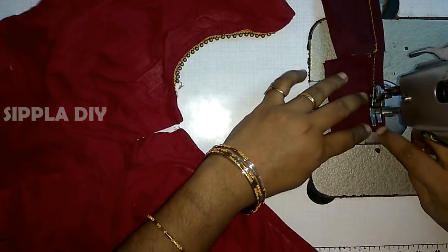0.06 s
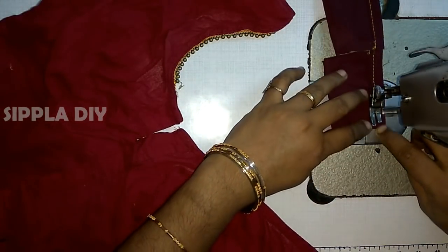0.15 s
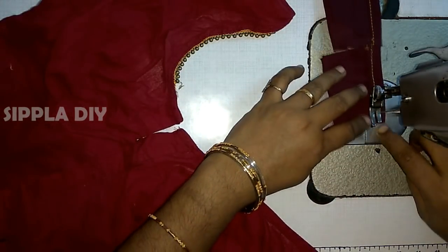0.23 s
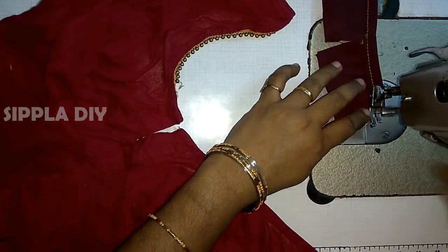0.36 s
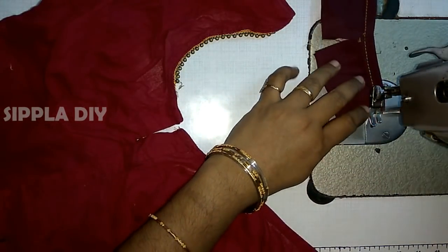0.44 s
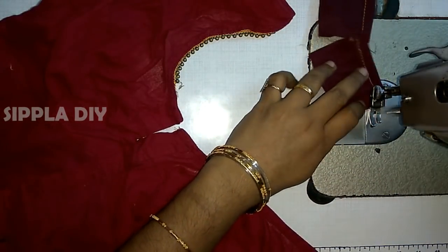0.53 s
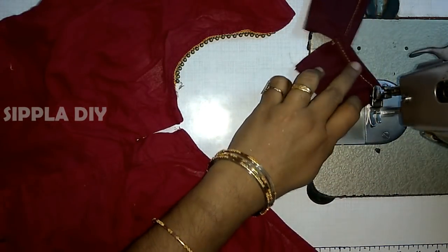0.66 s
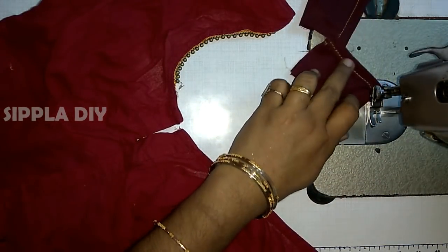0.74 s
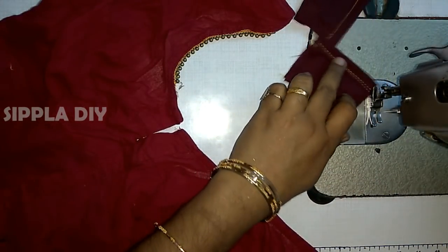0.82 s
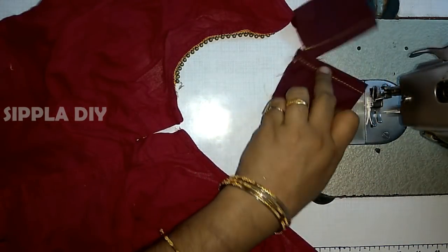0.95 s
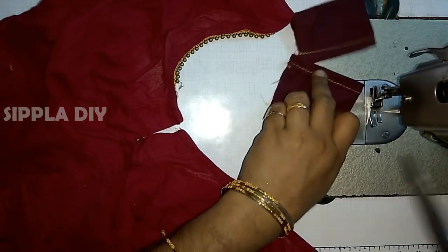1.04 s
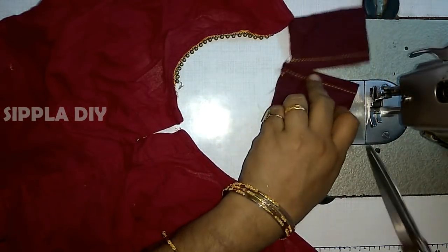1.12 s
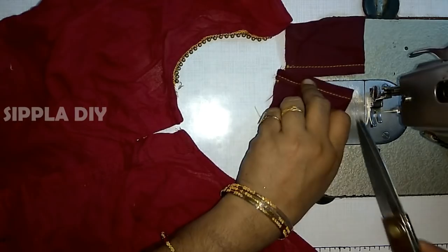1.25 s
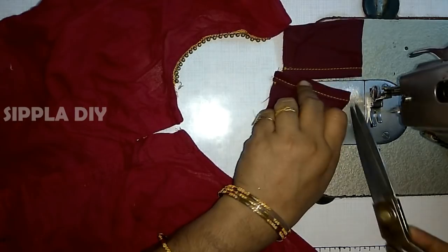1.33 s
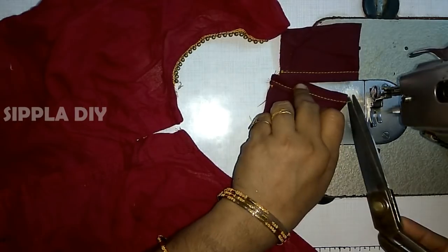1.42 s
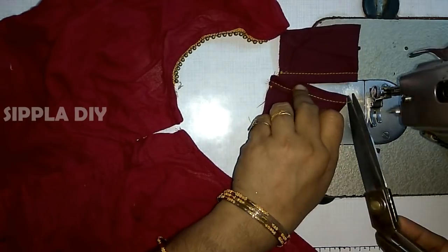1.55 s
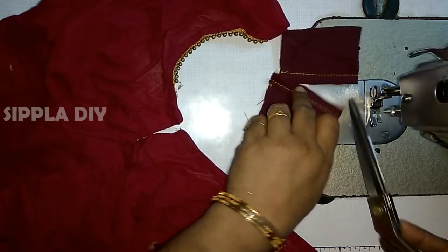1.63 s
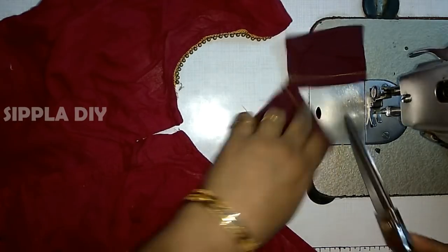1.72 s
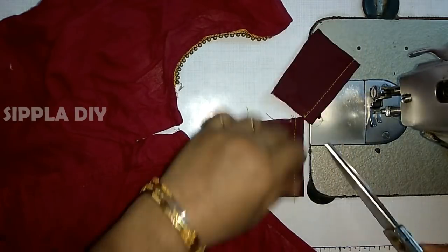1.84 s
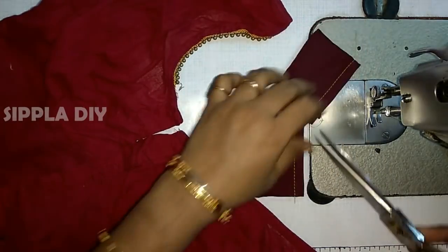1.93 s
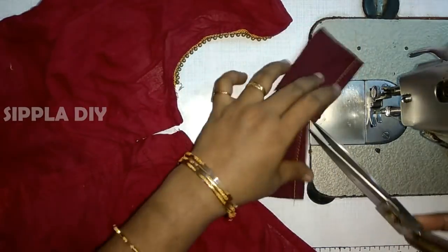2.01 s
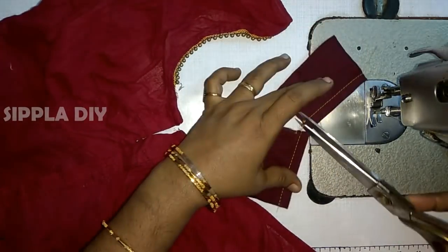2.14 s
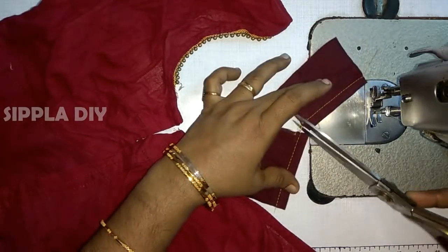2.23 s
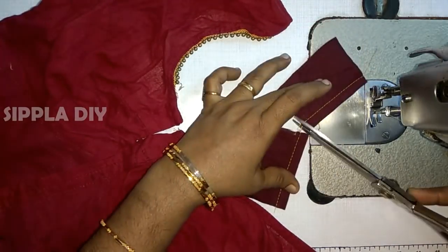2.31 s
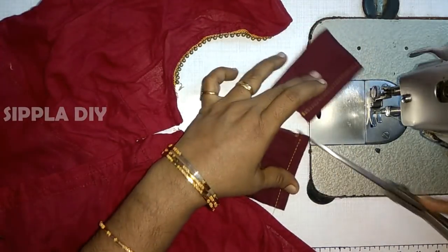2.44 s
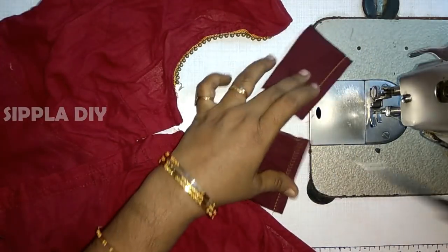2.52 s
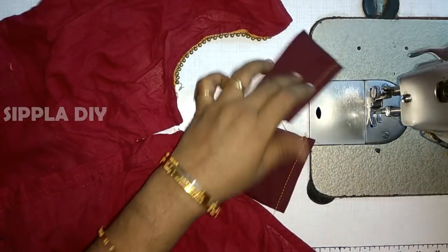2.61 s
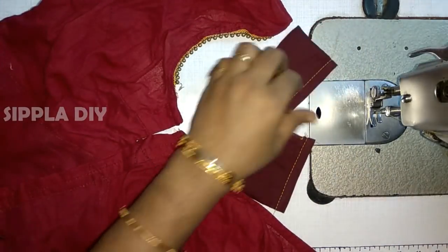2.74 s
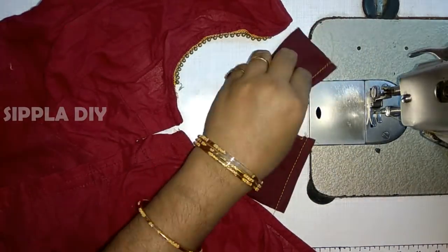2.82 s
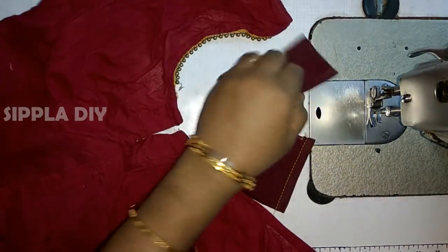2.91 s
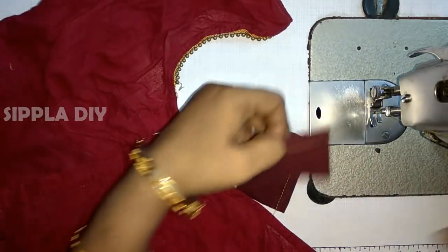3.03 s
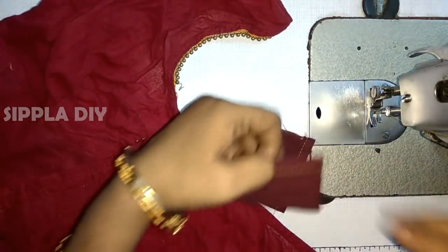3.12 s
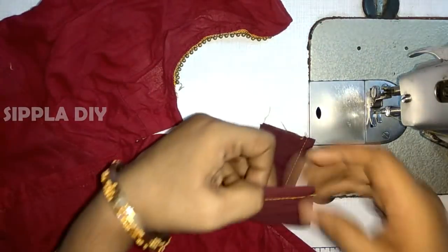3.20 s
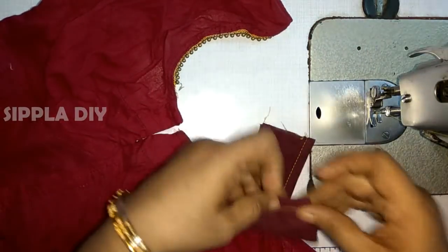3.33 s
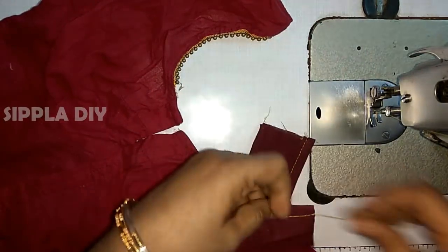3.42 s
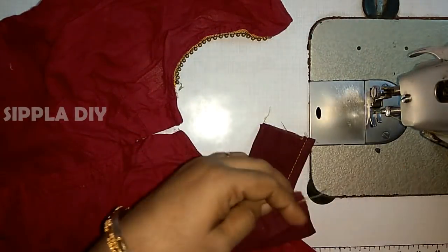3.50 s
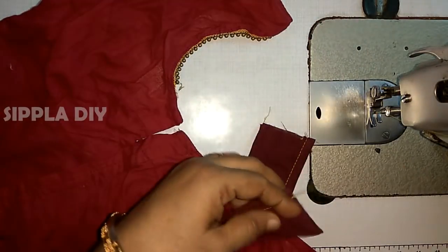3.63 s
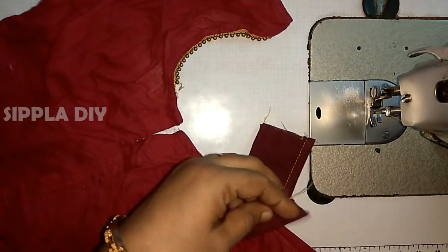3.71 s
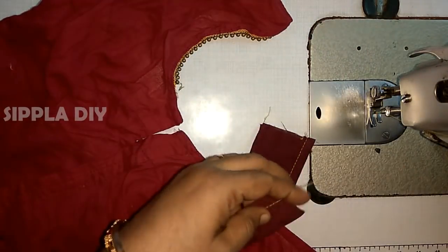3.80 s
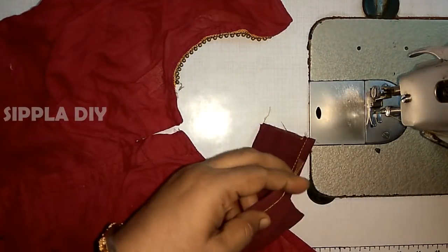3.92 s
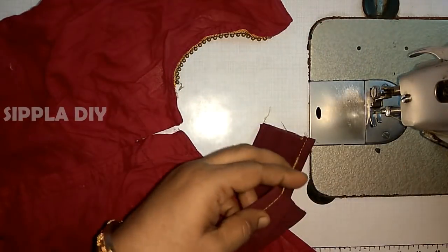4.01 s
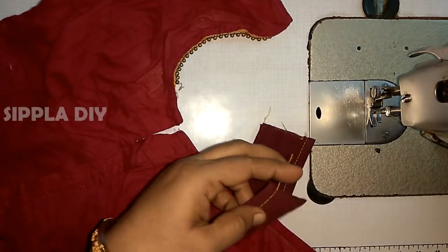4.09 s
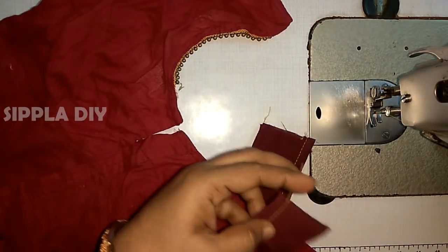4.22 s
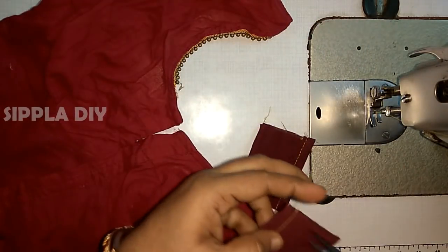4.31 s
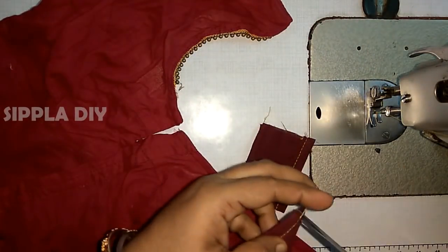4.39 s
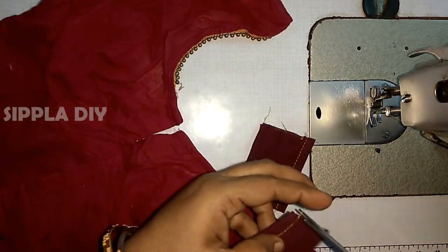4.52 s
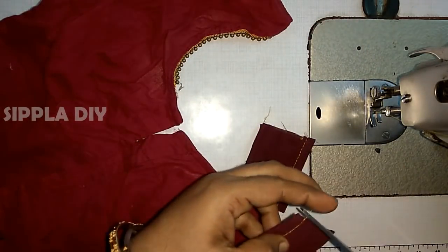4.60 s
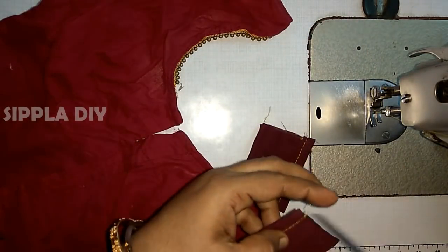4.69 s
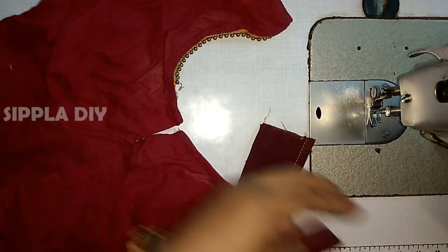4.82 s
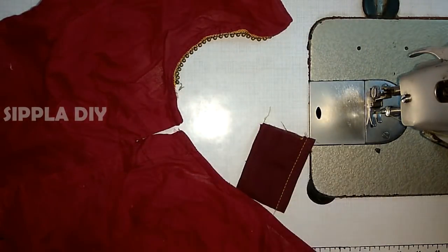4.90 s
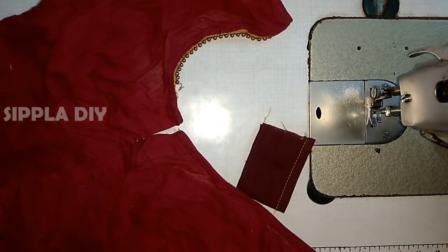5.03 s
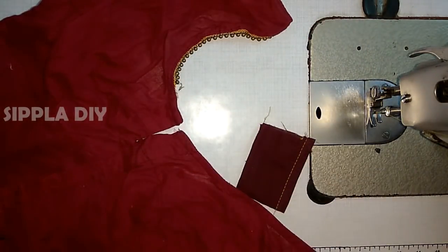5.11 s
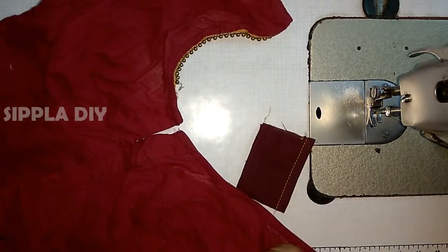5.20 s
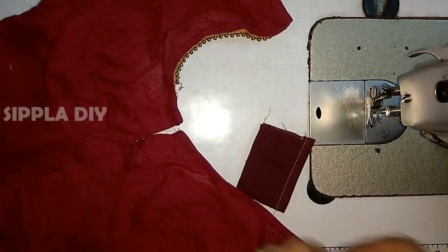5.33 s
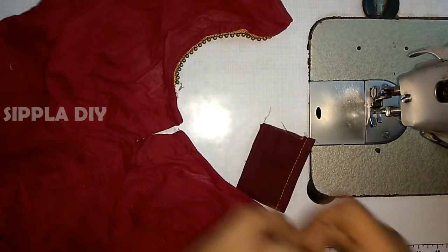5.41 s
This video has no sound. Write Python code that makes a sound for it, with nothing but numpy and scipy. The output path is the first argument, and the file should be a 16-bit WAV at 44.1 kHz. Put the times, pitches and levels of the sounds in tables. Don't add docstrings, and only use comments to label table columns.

```python
import sys
import numpy as np
from scipy import signal
from scipy.fft import rfft, irfft, next_fast_len
from scipy.io import wavfile
from scipy.ndimage import uniform_filter1d, minimum_filter1d, map_coordinates

SR = 44100
rng = np.random.default_rng(int(sys.argv[2]) if len(sys.argv) > 2 else 0)


def to_wav(sig):
    pcm = np.clip(np.atleast_2d(sig), -1, 1) * 32767
    pcm = np.round(pcm).astype(np.int16)
    wavfile.write(sys.argv[1], SR, pcm.T)


def gain_from_decibels(decibels):
    exponent = np.asarray(decibels, float) / 20
    return 10 ** exponent


N = 240520
LOW_MIDDLE_HZ, MIDDLE_HIGH_HZ = 800, 3000
BLOW_RISE_S = 0.013
# time_s, effort_db
RUNNING_EFFORT = [(0, -33.5), (.25, -35.5), (.4, -33), (.6, -37.5), (.7, -35.5), (.82, -28.5), (.95, -28.5),
                  (1.1, -33.5), (1.3, -29.5), (1.45, -39), (1.67, -48), (1.85, -61)]
# start_s, clack_db, feed_db, take_up_db
STITCH_CONTACTS = [(.0024, -14, -20.5, -15), (0.0607, -11, -17.5, -18), (0.1166, -14.5, -20.5, -17),
                   (.172, -15, -18.5, -21), (0.2305, -12.5, -19.5, -20), (0.2914, -13, -17, -26),
                   (0.3472, -15, -18, -21.5), (0.4033, -15, -18, -21.5), (.4584, -12.5, -20, -21),
                   (0.515, -11.5, -22, -23), (0.5721, -14.5, -24.5, -17), (0.631, -16, -20.5, -20.5),
                   (0.6933, -15.5, -21, -20), (0.7529, -17.5, -21, -19), (0.8119, -16, -18.5, -30),
                   (0.869, -19, -35, -18), (0.9239, -34, -25, -48), (0.9905, -23.5, -31, -17.5),
                   (1.065, -20.5, -50, -16.5), (1.1357, -20, -21, -23), (1.2065, -18.5, -22, -21.5),
                   (1.274, -19.5, -23.5, -21.5), (1.3421, -19.5, -51, -17), (1.4221, -20.5, -49, -22),
                   (1.5142, -17, -30, -17), (1.6211, -19.5, -37.5, -49), (1.72, -21, -69, -60)]


def unit(x):
    return x / np.sqrt(np.mean(x ** 2) + 1e-20)


def along(points, hz):
    f, v = np.transpose(points)
    return np.interp(np.log(hz + 1), np.log(f + 1), v)


def curves(rows, before_db=None):
    s, *columns = np.transpose(rows)
    return [np.interp(np.arange(N) / SR, s, c, before_db, before_db) for c in columns]


def filtered(x, response):
    m = next_fast_len(x.shape[-1] + 8192)
    spectrum = rfft(x, m) * response(np.fft.rfftfreq(m, 1 / SR))
    return irfft(spectrum, m)[..., :x.shape[-1]]


def colour(spectrum):
    return lambda f: gain_from_decibels(along(spectrum, np.minimum(f, 6900)))


def resonances(modes):
    def response(f):
        total = 0
        for k, (hz, width_hz, db) in enumerate(modes):
            damping = 1j * f * width_hz
            total = total + (-1) ** k * gain_from_decibels(db) * damping / (hz * hz - f * f + damping)
        return total
    return response


def bands(response, patchy_db, count):
    z = signal.stft(rng.standard_normal((2, N)), nperseg=256)[2]
    field = uniform_filter1d(rng.standard_normal(z.shape), size=3, axis=1)
    field = uniform_filter1d(field, size=count, axis=2)
    noise = signal.istft(z * gain_from_decibels(patchy_db * unit(field)), nperseg=256)[1][:, :N]

    def split(f):
        low = 1 / (1 + (f / LOW_MIDDLE_HZ) ** 6)
        below_high = 1 / (1 + (f / MIDDLE_HIGH_HZ) ** 6)
        return response(f) * np.array([low, below_high - low, 1 - below_high])[:, None]
    return [unit(part) for part in filtered(noise, split)]


def flutter(rate_hz, depth_db):
    knots = rng.standard_normal((2, int(N * rate_hz / SR) + 4))
    place = np.arange(N) * rate_hz / SR
    return gain_from_decibels(depth_db * np.array([map_coordinates(k, [place]) for k in knots]))


def sides(pan_db):
    return gain_from_decibels(np.array([[.5], [-.5]]) * pan_db)


def blows(times, dbs, pans_db, t60s, rise, lag):
    power = np.zeros((2, N + SR))
    for s, db, pan_db, t60 in np.broadcast(times, dbs, pans_db, t60s):
        t = np.arange(-SR // 20, round(t60 * SR)) / SR
        shape = gain_from_decibels(db - 60 * np.where(t < 0, -t / rise, t / t60))
        power[:, round((s + lag) * SR):][:, :len(t)] += (shape * sides(pan_db)) ** 2
    return np.sqrt(power[:, SR // 20:][:, :N])


def rings(times, dbs, hzs, pans_db, t60s, attack):
    out = np.zeros((2, N + SR))
    chance = rng.uniform(size=(len(times), 4, 1))
    for (s, db, hz, pan_db, t60), u in zip(np.broadcast(times, dbs, hzs, pans_db, t60s), chance):
        t = np.arange(round(t60 * SR)) / SR
        phase = u[0] + np.array([[0], [np.sign(u[1, 0] - .5) / 4]])
        gain = gain_from_decibels(db - 60 * t / t60) * sides(pan_db) * gain_from_decibels(4.6 * u[2:])
        note = np.sin(2 * np.pi * (hz * t + phase))
        out[:, round(s * SR):][:, :len(t)] += gain * (1 - np.exp(-t / attack)) * note
    return out[:, :N]


def turns():
    full_speed_s, slowing_cap_s = .058, .013
    s = np.transpose(STITCH_CONTACTS)[0]
    length = np.diff(s)
    return s[:-1], length, np.minimum(length - full_speed_s, slowing_cap_s)


def contacts():
    # turn_share, later_per_s of slowing, middle_db, bright_ring_hz, middle_ring_hz
    moving_parts = [
        (0, -1, -11.5, 5593, 1150),
        (.45, 4, -7, 4000, 2310),
        (.625, 1.4, -14, 4000, 1712),
    ]
    bright_scatter, middle_scatter, colour_scatter_db = .06, .035, 2.5
    start, length, slowing = turns()
    s, *dbs = np.transpose(STITCH_CONTACTS)
    share, later, middle_db, bright_hz, middle_hz = np.transpose(moving_parts)[:, :, None]
    times = start + length * (share + later * slowing)

    def pad(v, last):
        return np.append(v + 0 * times, last)
    u = rng.standard_normal((3, times.size + 1))
    return (pad(times, s[-1]),
            pad(np.array(dbs)[:, :-1], dbs[0][-1]),
            pad(middle_db, middle_db[0]) + colour_scatter_db * u[0],
            pad(bright_hz, bright_hz[0]) * np.exp(bright_scatter * u[1]),
            pad(middle_hz, middle_hz[0]) * np.exp(middle_scatter * u[2]))


def clatter():
    # freq_hz, density_db per Hz
    steel_spectrum = [(350, -34), (600, 11.5), (829, -8), (1160, -9.5), (1370, -16), (1570, -8.5),
                      (2810, -11.5), (5540, -11), (7260, -20), (9440, -45), (16000, -120)]
    s, db, middle_db, bright_hz, middle_hz = contacts()
    pan_db = 1.5 * rng.standard_normal(len(s))
    _, middle, high = bands(colour(steel_spectrum), patchy_db=5.0, count=3)
    burst = high * blows(s, db - 3, pan_db, 0.036, rise=0.03, lag=0.0017)
    burst += middle * blows(s, db + middle_db - 2.5, pan_db, 0.064, rise=0.025, lag=0.0008)
    out = burst * flutter(600, depth_db=1.5)
    out += rings(s, db - 3, bright_hz, pan_db, .028, attack=.002)
    out += rings(s, db + middle_db, middle_hz, pan_db, .05, attack=0.0013)
    for late, place, size in rng.uniform(size=(5, 3, len(s))):
        small_hz = 3000 + 3600 * place
        out += rings(s + 0.011 * late, db - 11.0 - 7 * size, small_hz, pan_db, 0.033, attack=0.0015)
    whirr_db = curves(RUNNING_EFFORT, before_db=-120)[0] - 11.5
    return out + gain_from_decibels(whirr_db) * (middle + high) * flutter(300, depth_db=4.5)


def bed():
    # centre_hz, width_hz, level_db
    bed_modes = [(147, 100, -3.5), (322.2, 108, 3.5), (434, 110, 0), (542.2, 39, 2), (1150, 13, -13.5)]
    # turn_share, thud_db, rap_db, thud_db_per_s and rap_db_per_s of slowing
    bar_reversals = [
        (0.432, -10.5, -8.5, 598.5, 599.5),
        (.76, -1, -1, -150, -300),
    ]
    # thud_db, rap_db
    turn_jolts = [(-30.5, -17), (-32.5, -20), (-22.5, -25), (-24, -21.5), (-25, -20), (-31, -19),
                  (-39.5, -20.5), (-27, -18.5), (-32, -16), (-19.5, -27.5), (-33, -24.5), (-37.5, -23.5),
                  (-32.5, -19), (-34, -15.5), (-27.5, -25.5), (-32, -21), (-25, -22.5), (-25.5, -27),
                  (-21.5, -23.5), (-24, -26.5), (-23, -23), (-22, -27), (-22.5, -28), (-31, -29),
                  (-33, -32.5), (-45, -45)]
    thud_hz, thud_scatter = 162.5, .13
    rap_late = np.array([[0.023], [0.1303]])
    low, casting, _ = bands(resonances(bed_modes), patchy_db=3.5, count=6)
    start, length, slowing = turns()
    share, thud_db, rap_db, thud_grows, rap_grows = np.transpose(bar_reversals)[:, :, None]
    jolt_thud_db, jolt_rap_db = np.transpose(turn_jolts)

    s = (start + share * length).ravel()
    db = (jolt_thud_db + thud_db + thud_grows * slowing).ravel()
    hz = thud_hz * np.exp(thud_scatter * rng.standard_normal(len(s)))
    out = rings(s, db + 7, hz, 0, .075, attack=.004)
    out += rings(s, db - 11.5, 0.23 * hz, 0, 0.024, attack=.008)
    out += rings([.555], [-24], [75], 0, .12, attack=0.0084)

    s = (start + (share + rap_late) * length).ravel()
    db = (jolt_rap_db + rap_db + rap_grows * slowing).ravel()
    for hz, _, mode_db in bed_modes[1:4]:
        scatter_db = 3.0 * rng.standard_normal(len(s))
        out += rings(s, db + mode_db - 10 + scatter_db, hz, 0, 0.12, attack=.003)
    out += blows(s, db - 6.5, 0, 0.082, rise=0.057, lag=0.0052) * (low + gain_from_decibels(-3.0) * casting)
    rumble_db = curves(RUNNING_EFFORT, before_db=-120)[0] - 6
    return out + gain_from_decibels(rumble_db) * low * flutter(30, depth_db=3.5)


def room(x):
    # freq_hz, t60_s
    wall_decay = [(150, 0.27), (1000, 0.2), (4000, .2), (8000, 0.12)]
    hz, t, z = signal.stft(rng.standard_normal((2, SR // 3)), SR, nperseg=256)
    decay = gain_from_decibels(-60 * t / along(wall_decay, hz)[:, None])
    tail = signal.istft(z * decay, SR, nperseg=256)[1]
    delayed = np.pad(x, ((0, 0), (250, 0)))
    return signal.fftconvolve(delayed, tail / np.linalg.norm(tail[0]), axes=1)[:, :N]


def quiet():
    # time_s, level_db
    rest_level = [(1.84, -73.5), (2.31, -68), (3.06, -64), (3.6, -71.5), (4.17, -66.5), (4.55, -71),
                  (5.2, -64.5)]
    # freq_hz, density_db per Hz
    air_spectrum = [(15, -70), (25, -43), (97, -4), (123, -13.5), (183, -6), (365, -13.5), (401, -14.5),
                    (441, -15), (1010, -21.5), (1320, -26.5), (5590, -33), (7260, -40), (9440, -70),
                    (16000, -120)]
    # centre_hz, width_hz, level_db
    port_mode = [(5370, 350, 5.5)]
    # over_mean_db, share of the level swings
    air_layers = [
        (4, 0.7),
        (-5, 1.4),
        (-1.5, .5),
    ]
    port = resonances(port_mode)
    parts = bands(lambda f: colour(air_spectrum)(f) * (1 + np.abs(port(f))), patchy_db=4.5, count=20)
    level_db = curves(rest_level)[0]
    mean_db = level_db.mean()
    out = 0
    for (db, share), part, depth_db in zip(air_layers, parts, (2.5, 1.2, 1.2)):
        layer_db = mean_db + 5.0 + db + share * (level_db - mean_db)
        out = out + gain_from_decibels(layer_db) * part * flutter(6.4, depth_db)
    return out


def knocks():
    # start_s, peak_db, middle_db, ring_hz, left_right_db
    steel_knocks = [(1.6926, -19.5, -12.5, 5240, -3), (1.7396, -8.5, -8, 5194, 11),
                    (2.0134, -52, -3, 1590, 11), (2.4334, -64, 8, 1420, 2), (2.5115, -17, 0, 5380, 3.5),
                    (2.8568, -63.5, 28, 1190, 5), (2.9586, -37, -17, 3280, -4), (3.0144, -9, 4, 3333, 1),
                    (3.028, -24, 10, 2890, 4.5), (3.0573, -32.5, 12, 1794, 6),
                    (3.0773, -26.5, 6.5, 4540, -0.5), (3.928, -55, 5.5, 1317, -1.5),
                    (4.014, -61, 20.5, 1206, 1), (4.3485, -52, -20, 4440, -12),
                    (4.7763, -20.5, -30, 5450, -2), (4.777, -47.5, -1, 1740, 6),
                    (5.0545, -33.5, -38, 5000, 4.5), (5.208, -25.5, 1, 2870, 4.5),
                    (5.244, -27.5, -3.5, 3260, 3.5), (5.3029, -13.5, 2, 1550, 4),
                    (5.3308, 0, -9.5, 2470, 3)]
    # centre_hz, width_hz, level_db
    blade_modes = [(1600, 50, -23), (2380, 78, -12.5), (3520, 450, 4), (4296, 750, 5), (5190, 830, 7.5),
                   (6400, 400, -27)]
    # start_s, peak_db, note_hz, t60_s
    table_thumps = [(1.686, -30.5, 200, 0.08), (1.739, -32.5, 250, 0.13), (2.014, -41.5, 348, 0.099),
                    (2.176, -34.5, 443, 0.078), (2.433, -49.5, 166.6, 0.24), (2.502, -25, 432, 0.029),
                    (2.514, -23.5, 305, 0.11), (2.863, -28.5, 567, 0.088), (2.956, -26.5, 446, 0.061),
                    (3.012, -19, 358.6, 0.059), (3.055, -19, 480, 0.088), (3.079, -25.5, 548, 0.095),
                    (3.927, -40, 427, 0.057), (4.013, -32, 162, 0.21), (4.379, -52, 218, 0.15),
                    (5.208, -20, 497, 0.087), (5.244, -20, 441, 0.065), (5.302, -29.5, 376, 0.4),
                    (5.33, -15.5, 553, 0.12)]
    # centre_hz, width_hz, level_db
    table_modes = [(159, 80, -5), (317, 100, -2), (494, 90, -1.5), (648, 130, -1)]
    t60 = 0.054
    s, db, middle_db, hz, pan_db = np.transpose(steel_knocks)
    blades = resonances(blade_modes)
    _, middle, high = bands(lambda f: np.abs(blades(f)) + gain_from_decibels(-5.0), patchy_db=1.0, count=3)
    crack = high * blows(s, db - 13, pan_db, t60, rise=BLOW_RISE_S, lag=0.0014)
    crack += middle * blows(s, db + middle_db - 8.5, pan_db, 1.3 * t60, rise=BLOW_RISE_S, lag=0.0028)
    first_contact = blows(s, db - 9.5, pan_db, 0.12 * t60, rise=BLOW_RISE_S, lag=0.0022)
    crack += (high + gain_from_decibels(-13.0) * middle) * first_contact
    ping_db = db - 1 + middle_db * (hz < MIDDLE_HIGH_HZ)
    ping = rings(s, ping_db, hz, pan_db, 0.52 * t60, attack=0.0021)

    s, db, hz, t60 = np.transpose(table_thumps)
    low = bands(resonances(table_modes), patchy_db=2.0, count=6)[0]
    thump = low * blows(s, db - 5.0, 0, t60, rise=0.02, lag=0.0036)
    thump += rings(s, db - 2.0, hz, 0, 0.65 * t60, attack=0.00089)
    return crack + thump, ping


def drags():
    # start_s, rise_s, hold_s, level_db, hiss_db
    slides = [(1.764, 0.025, 0.016, -39.5, -5), (2.004, 0.012, 0.026, -58, -5.5),
              (2.026, 0.032, 0.043, -52.5, 1), (2.137, 0.036, 0.011, -41, -1.5),
              (2.524, 0.0036, 0.045, -50, 6), (3.031, 0.022, .022, -31, -11), (3.229, 0.054, 0.11, -70, -1),
              (3.877, 0.038, .03, -67.5, -3.5), (4.79, 0.059, 0.14, -65, -9.5),
              (5.342, .005, 0.021, -33, 4.5)]
    # centre_hz, width_hz, level_db
    rustle_modes = [(400, 470, -13.5), (1071.3, 220, 0.5), (1600, 210, 4), (2660, 400, -0.5),
                    (4000, 240, -7.5), (5254, 660, -13.5)]
    rise_db, release_db_per_s = 23.5, 418
    rustle = resonances(rustle_modes)
    low, middle, high = bands(lambda f: np.abs(rustle(f)) + gain_from_decibels(-12) / (1 + (f / 5500) ** 4),
                              patchy_db=6.0, count=10)
    t, out = np.arange(N) / SR, 0
    for s, rise, hold, db, hiss_db in slides:
        swell_db = rise_db * np.minimum((t - s) / rise - 1, 0)
        release_db = release_db_per_s * (s + rise + hold - t)
        friction = gain_from_decibels(-8.5) * low + middle + gain_from_decibels(hiss_db) * high
        out = out + gain_from_decibels(db + 4.0 + np.minimum(swell_db, release_db)) * friction
    return out * flutter(170, depth_db=1.0)


def bird():
    # start_s, length_s, from_hz, to_hz, level_db
    chirp_notes = [
        (4.215, 0.018, 5900, 5950, -61),
        (4.225, 0.048, 5960, 5970, -60.5),
    ]
    t, out = np.arange(N) / SR, 0
    for s, length, from_hz, to_hz, db in chirp_notes:
        u = np.clip((t - s) / length, 0, 1)
        cycles = length * (from_hz * u + (to_hz - from_hz) * u * u / 2)
        out = out + gain_from_decibels(db) * np.sin(np.pi * u) * np.sin(2 * np.pi * cycles)
    return out * flutter(220, depth_db=9)


def scene():
    running = clatter() + bed()
    handled, ping = knocks()
    echo = room(gain_from_decibels(-13.0) * running + gain_from_decibels(-11) * handled)
    return running + handled + ping + drags() + echo + quiet() + bird()


def band_limit(x):
    return signal.sosfilt(signal.butter(12, 15140, fs=SR, output="sos"), x)


def record(dry):
    # freq_hz, gain_db
    mic_response = [(20, 0), (90, 1), (6800, -3), (7500, -14), (8000, -41.5), (8500, -21.5), (9600, -25.5),
                    (10300, -60.5), (15000, -57), (15500, -120)]
    # freq_hz, left_right_db
    left_brightness = [(300, 1), (2000, -1.5), (6000, 1.5), (9000, 8.5)]
    # freq_hz, density_db per Hz
    hiss_spectrum = [(6000, -20), (7500, -2.5), (9800, -12.5), (10500, -19), (15000, -23), (15500, -120)]
    x = filtered(dry, lambda f: gain_from_decibels(along(mic_response, f)) * sides(along(left_brightness, f)))
    x = x + gain_from_decibels(-84.5) * bands(lambda f: gain_from_decibels(along(hiss_spectrum, f)), patchy_db=1.0, count=6)[2]

    treble = filtered(x, lambda f: 1 - 1 / (1 + (f / 1100) ** 4))
    now = np.abs(uniform_filter1d(np.mean(treble ** 2, 0), size=150)) + 1e-12
    ahead = np.pad(now, (0, 400), 'edge')[400:]
    soon = -minimum_filter1d(-ahead, size=800)
    hold = np.clip(1.8 - np.log10(soon / now) / 2.4, .25, 1)
    x = x + treble * (uniform_filter1d(hold, size=100) - 1)

    x = x / (1 + np.abs(x / 1.2) ** 8) ** (1 / 8)
    return band_limit(x)


dry = scene()
out = record(dry)
to_wav(out)
```